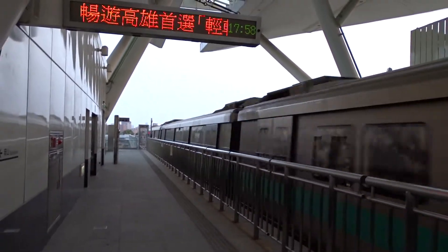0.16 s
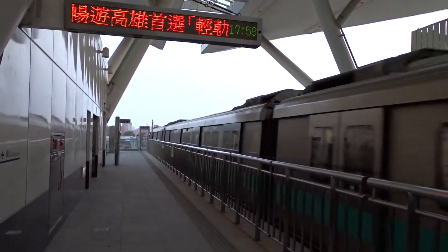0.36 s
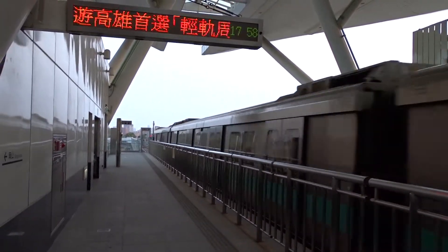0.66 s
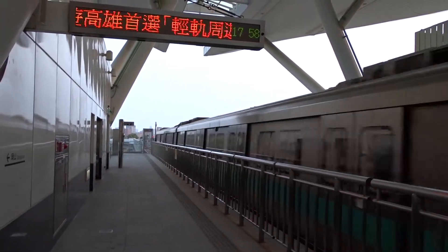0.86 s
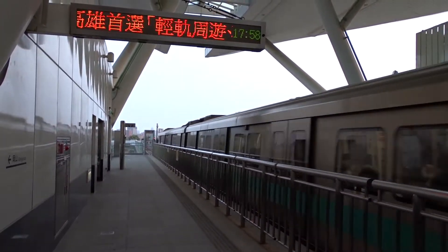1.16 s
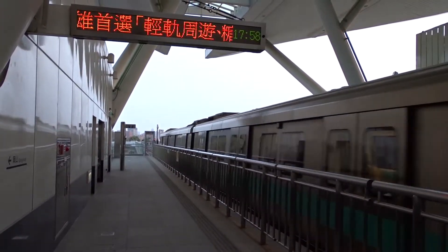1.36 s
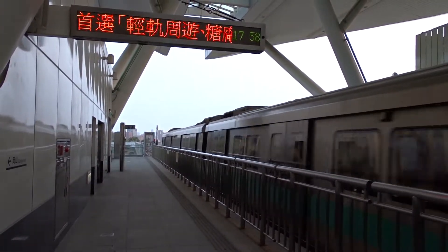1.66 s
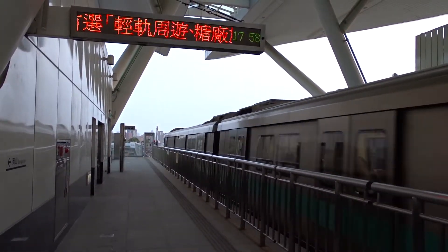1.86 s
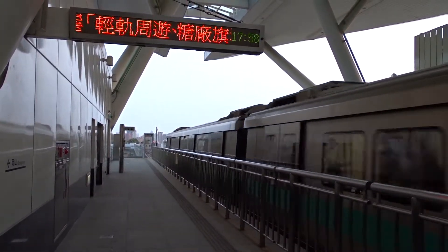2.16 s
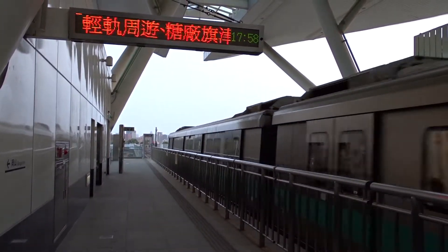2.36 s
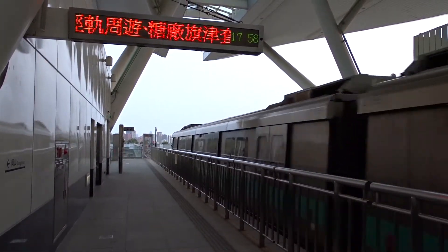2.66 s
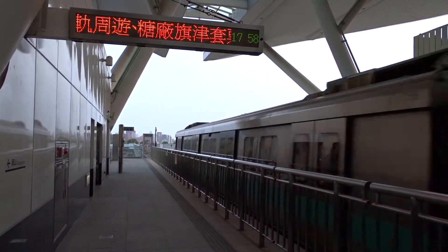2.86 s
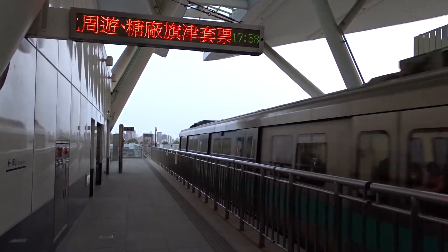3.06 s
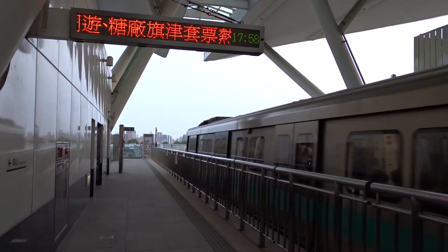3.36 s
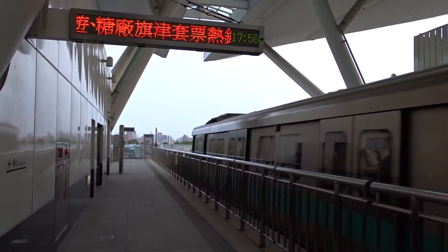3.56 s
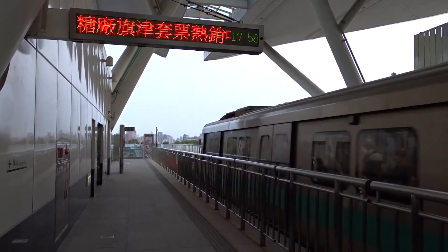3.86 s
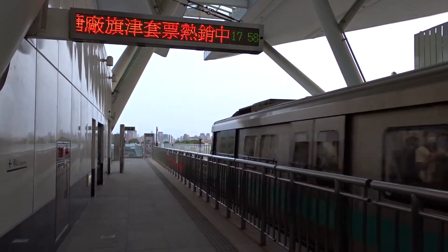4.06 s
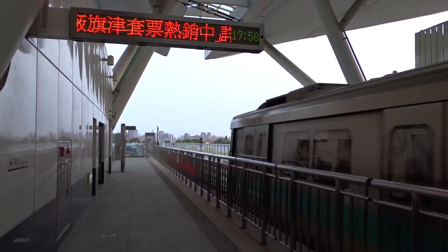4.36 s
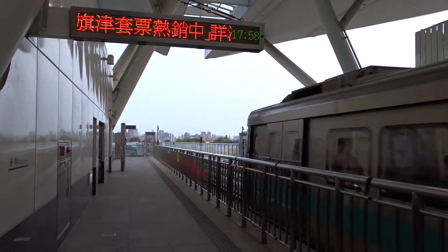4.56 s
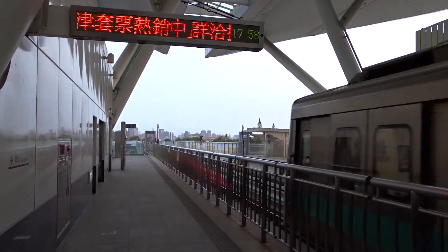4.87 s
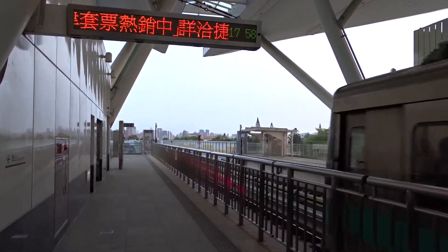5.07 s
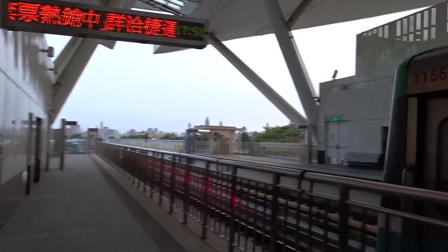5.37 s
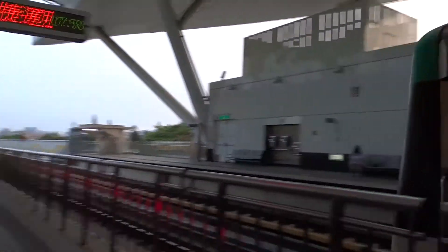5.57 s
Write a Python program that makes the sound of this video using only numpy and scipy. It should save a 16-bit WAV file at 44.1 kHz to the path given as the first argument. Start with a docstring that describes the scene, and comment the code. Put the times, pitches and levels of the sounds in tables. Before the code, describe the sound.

An electric train slows alongside an open, canopied elevated platform, cars passing close to a stereo microphone. A shrill, nearly constant electronic squeal sits over rumble and wheel roar. Gear whine slides downward while fixed hums and an underframe ring swell with passing cars. Rail ring and brake hiss grow early, then fade; the train is still moving at the end.

```python
"""Elevated platform: an electric train brakes alongside, its cars passing close to the microphone.
Inverters sing around multiples of a switching carrier, in sidebands that close up as the train slows.
Gear whine and motor growl fall with speed; a fixed underframe tone swells with each motor car.
Filtered noise makes the rumble, roar, rail ring and brake hiss; blurred fixed tones make the equipment hum."""
import sys
import numpy as np
from scipy import signal
from scipy.fft import rfft, irfft, next_fast_len
from scipy.io import wavfile
from scipy.ndimage import uniform_filter1d, map_coordinates

SR = 44100
rng = np.random.default_rng(int(sys.argv[2]) if len(sys.argv) > 2 else 0)


def output_pcm(signal):
    """Save a mono or channel-first signal as 16-bit PCM at the path in sys.argv[1].

    Samples are clipped to [-1, 1] before scaling.
    """
    pcm = np.clip(np.atleast_2d(signal).T, -1, 1) * 32767
    wavfile.write(sys.argv[1], SR, np.round(pcm).astype(np.int16))


N = 252252

# Reaches (_REACH_M): track distance from the microphone at which the gain is 3 dB down.
START_SPEED_M_PER_S, BRAKING_M_PER_S2, MESH_HZ_PER_M_PER_S = 11, 0.81, 80

# Inverter sidebands: carrier_multiple, distance_stator_cycles, level_db
INVERTER_SIDEBANDS = [(2, 1, -9.3), (2, 3.5, -13), (3, 1.1, -14.5), (3, 3, -15), (3, 6, -14), (4, 1, -17),
                      (4, 3.3, -22), (5, 2.5, -25), (6, 0.76, -21), (7, 2, -28), (8, 2, -23), (9, 3, -30),
                      (10, 2.4, -28), (11, 2.6, -37)]
# Gain of the inverter song: time_s, gain_db
SONG_GAIN = [(0, -28), (.85, -23), (2, -24), (3, -21), (3.55, -22.8), (4.1, -22), (5.72, -19.5)]
NOMINAL_CARRIER_HZ = 1000
TILT_START_DB_PER_OCTAVE, TILT_RISE_DB_PER_OCTAVE_S = -1.63, 0.37  # high tones open up
NEAR_INVERTER_S, NEAR_INVERTER_REACH_M, NEAR_SHARPENING_SHARE = 2.9, 3.5, 0.008
SAG_SHARE_PER_S, SAG_ZERO_S = 0.001, 4.2  # slow pitch fall, zero shift at SAG_ZERO_S

# Gearboxes passing: time_s, whine_db
GEARBOX_PASSES = [(.1, -29.5), (.92, -29), (2.35, -30.5), (3.95, -27.5), (4.9, -29)]
# Motors passing: time_s, growl_db
MOTOR_PASSES = [(.1, -30), (1.27, -26.5), (2.65, -36)]
GEARBOX_REACH_M, MOTOR_REACH_M = 2.4, 1.2
# Motor cars alongside, underframes ringing: start_s, end_s, ring_db
MOTOR_CARS = [(1.2, 2.48, -27), (3.0, 4.45, -27.5)]
CAR_ATTACK_S, CAR_RELEASE_S = 0.12, 0.18

# Rolling noise: time_s, body_rumble_db, wheel_roar_db
ROLLING_LEVELS = [(0, -22.5, -25.5), (.7, -24.5, -25.5), (1.3, -23, -23.5), (2.5, -22.5, -24),
                  (3.15, -25, -25), (3.8, -22.5, -23), (4.5, -26.5, -25), (5.72, -26, -26.5)]
# Bogies shaking the platform: time_s, boom_db
BOGIE_PASSES = [(3.05, -33.5), (4.9, -36.5)]
BOGIE_REACH_M = 0.67
# Car body rumble spectrum: frequency_hz, relative_db_per_hz
RUMBLE_SPECTRUM = [(15, -26), (30, -24), (55, -36), (85, -15), (130, -9), (220, -6.5), (300, -4),
                   (400, -4.5), (500, -9.5), (750, -21), (950, -37), (2000, -99)]
# Platform boom spectrum: frequency_hz, relative_db_per_hz
BOOM_SPECTRUM = [(15, -20), (45, -2), (85, 7), (140, -13), (400, -60)]
# Wheel roar spectrum: frequency_hz, relative_db_per_hz
ROAR_SPECTRUM = [(200, -82), (500, 3), (850, 5), (1000, 0.5), (1300, 0), (1700, -3), (2400, -5.5),
                 (3000, -12), (4000, -10.5), (8000, -49)]
# Rail ring spectrum: frequency_hz, relative_db_per_hz
RAIL_SPECTRUM = [(1500, -10), (2600, -20), (3200, 7), (3600, 0), (4100, 2), (4600, -10), (7000, -46)]
# Brake hiss spectrum: frequency_hz, relative_db_per_hz
HISS_SPECTRUM = [(2500, -8), (4500, 1), (5500, 4.5), (6500, 4.5), (7700, 6), (8600, 3.5), (9500, 0),
                 (10500, -2), (11200, -9.5)]
# Friction: levels at time 0 before approach and flutter, then a steady fall
RAIL_START_DB, RAIL_FALL_DB_PER_S = -30, 2.5
HISS_START_DB, HISS_FALL_DB_PER_S = -34.5, 0.77
APPROACH_MID_S, APPROACH_RISE_S, DISTANT_DB = 0.73, 0.14, -3.5

# Swells of the deep drone: start_s, end_s, level_db
DEEP_DRONE_SWELLS = [(.18, .26, -29.5), (.7, .8, -33), (1.15, 1.38, -27), (1.56, 1.72, -27),
                     (1.93, 1.98, -28), (2.76, 3.02, -30), (3.35, 3.56, -24.5), (3.8, 3.92, -29.5),
                     (5.12, 5.2, -31.5), (5.4, 5.55, -33.5)]
DRONE_MEAN_DB, DRONE_SWELL_S = -36, 0.047
# Fans and compressors: pitch_hz, width_hz, level_db
EQUIPMENT_HUMS = [(55.1, 11, -39.5), (120.6, 3.3, -41), (268.6, 10.4, -39), (341.7, 7.4, -41),
                  (525.4, 9.9, -44.5), (566, 6.4, -43), (1164, 36, -40)]
FAN_S, FAN_REACH_M, FAN_HZ, FAN_DB = 2.66, 3.2, 267, -31

# Left-right likeness of the two ports: frequency_hz, correlation_0_to_1
PORT_LIKENESS = [(60, 1), (150, 1), (500, 0.85), (1100, 1), (2000, 0.97), (5000, 0.78), (10400, 0.81)]
# Phase by which the left port leads: frequency_hz, lead_rad
LEFT_LEAD = [(40, -0.54), (170, -0.51), (300, -0.7), (550, -1.02), (1000, -1.13), (2000, -0.97),
             (4000, -0.53), (8000, 0.052), (10500, -1.04)]
TOP_HZ = 11050


def inverters(mesh_hz, mesh_per_cycle=23, spread_hz=11, spread_growth=1.43, squeal_db=-1.6):
    """Motor iron squeals at twice the switching rate; sideband pairs flank multiples of that rate."""
    t = seconds()
    stator_hz = mesh_hz / mesh_per_cycle
    sharpening = NEAR_SHARPENING_SHARE * nearness(NEAR_INVERTER_S, NEAR_INVERTER_REACH_M) ** 2
    sag = SAG_SHARE_PER_S * (SAG_ZERO_S - t)
    carrier_hz = NOMINAL_CARRIER_HZ * (1 + sharpening + sag)

    # Railing and wheels cut off short waves first: high tones flutter together
    flutter_db = 0.85 * wobble(28) + 0.55 * wobble(75)
    tilt_db_per_octave = TILT_START_DB_PER_OCTAVE + TILT_RISE_DB_PER_OCTAVE_S * t + flutter_db

    song = amp(squeal_db) * blurred(2 * carrier_hz, width_hz=33, steady=8, pace=mesh_hz)
    for multiple, distance, level_db in INVERTER_SIDEBANDS:
        gain = amp(level_db + tilt_db_per_octave * np.log2(multiple / 2))
        width_hz = spread_hz * multiple ** spread_growth
        for side in (-1, 1):
            hz = multiple * carrier_hz + side * distance * stator_hz
            song += gain * blurred(hz, width_hz, steady=0.15, pace=mesh_hz)
    return song * amp(curves(SONG_GAIN)[0] + 0.2 * flutter_db)


def gears(mesh_hz):
    """Tooth mesh whines, motors growl an octave below, and the underframe rings at a fixed pitch."""
    whine = passes(GEARBOX_PASSES, GEARBOX_REACH_M) * singing(mesh_hz, halo_db=2)
    growl = passes(MOTOR_PASSES, MOTOR_REACH_M) * singing(mesh_hz / 2, halo_db=5)
    frame = swells(MOTOR_CARS, CAR_ATTACK_S, CAR_RELEASE_S) * singing(674, halo_db=1.5)
    return whine + growl + frame


def wheels():
    """Car bodies rumble, bogies boom, wheels roar, rails ring and brake pads hiss unevenly."""
    t = seconds()
    rumble_db, roar_db = curves(ROLLING_LEVELS)
    chafe_db = approach_db() + 0.9 * wobble(26) + 0.55 * wobble(69)
    rail_db = RAIL_START_DB - RAIL_FALL_DB_PER_S * t + chafe_db
    hiss_db = HISS_START_DB - HISS_FALL_DB_PER_S * t + chafe_db

    rumble = amp(rumble_db) * rush(RUMBLE_SPECTRUM, patchy_db=1.0)
    boom = passes(BOGIE_PASSES, BOGIE_REACH_M) * rush(BOOM_SPECTRUM, patchy_db=-2.0)
    roar = amp(roar_db) * rush(ROAR_SPECTRUM, patchy_db=1.0)
    rail = amp(rail_db) * rush(RAIL_SPECTRUM, patchy_db=2.0)
    hiss = amp(hiss_db) * rush(HISS_SPECTRUM, patchy_db=1.0)
    return rumble + boom + roar + rail + hiss


def equipment(surge_db=2.5):
    """Underfloor machines hum at fixed pitches; the drone surges and swells, one fan passes close."""
    surging = amp(DRONE_MEAN_DB + surge_db * wobble(7))
    swelling = swells(DEEP_DRONE_SWELLS, DRONE_SWELL_S, DRONE_SWELL_S)
    drone = np.hypot(surging, swelling) * blurred(175, width_hz=5, steady=4.6)
    fan = amp(FAN_DB) * nearness(FAN_S, FAN_REACH_M) * blurred(FAN_HZ, width_hz=5, steady=1.5)
    hums = sum(amp(db) * blurred(hz, width_hz, steady=0.033) for hz, width_hz, db in EQUIPMENT_HUMS)
    return drone + fan + hums


def microphone(pair):
    """Two close ports share most of the sound, the right mostly ahead; canopy echoes set them apart."""
    def split(hz):
        angle = np.arccos(np.clip(along(PORT_LIKENESS, hz), -1, 1)) / 2
        return np.array([np.cos(angle), np.sin(angle)])

    common, diffuse = filtered(pair, split)
    ports = np.array([common + diffuse, common - diffuse])
    return filtered(ports, lambda hz: np.exp(0.5j * np.outer([1, -1], along(LEFT_LEAD, hz))))


def singing(hz, halo_db):
    """A clear direct tone inside the wider halo of its echoes, rms 1."""
    core = blurred(hz, width_hz=11, steady=2)
    halo = blurred(hz, width_hz=41.5, steady=0.93)
    return unit(core + amp(halo_db) * halo)


def blurred(hz, width_hz, steady, pace=1, size=8192):
    """Two versions of a tone over many changing paths: level and phase wander, faster at higher pace."""
    offset_hz = np.fft.rfftfreq(size, N / SR / size)
    lowpass = 1 / (1 + (offset_hz / width_hz) ** 4) ** 0.5
    parts = irfft(rfft(rng.standard_normal((2, 2, size))) * lowpass)
    paths = unit(parts[0] + 1j * parts[1])
    paths = unit(paths / (1 + abs(steady) * np.abs(paths) ** 2) ** 0.5)  # evens out the level

    travel = np.cumsum(pace * np.ones(N))
    knots = np.linspace(0, travel[-1], size)
    turn = np.exp(2j * np.pi * np.cumsum(hz * np.ones(N)) / SR)
    return unit(np.array([(np.interp(travel, knots, path) * turn).real for path in paths]))


def rush(spectrum, patchy_db):
    """Two unrelated noises, jointly rms 1, sharing time-frequency patches of random gain."""
    noise = signal.stft(rng.standard_normal((2, N)), nperseg=512)[2]
    field = rng.standard_normal(noise.shape[1:])
    field = uniform_filter1d(field, size=9, axis=0)
    field = uniform_filter1d(field, size=12, axis=1)
    pair = signal.istft(noise * amp(patchy_db * unit(field)), nperseg=512)[1][:, :N]
    return unit(filtered(pair, lambda hz: amp(along(spectrum, hz))))


def speed():
    """Train speed in m/s under even braking."""
    return START_SPEED_M_PER_S - BRAKING_M_PER_S2 * seconds()


def nearness(pass_s, reach_m):
    """Gain 0-1 of a part that passes at pass_s: one over its distance."""
    track_m = np.cumsum(speed()) / SR
    offset_m = track_m - np.interp(pass_s, seconds(), track_m)
    return 1 / np.hypot(1, offset_m / reach_m)


def passes(rows, reach_m):
    """Joint gain of like parts passing in turn, their powers added."""
    return np.sqrt(sum((amp(db) * nearness(pass_s, reach_m)) ** 2 for pass_s, db in rows))


def swells(rows, attack_s, release_s):
    """Summed gains that rise, hold from start to end and die away."""
    t = seconds()
    total = 0
    for start_s, end_s, level_db in rows:
        before = np.minimum(t - start_s, 0) / attack_s
        after = np.maximum(t - end_s, 0) / release_s
        total = total + amp(level_db) * np.exp(-before ** 2 - after ** 2)
    return total


def approach_db():
    """Friction builds up to 0 dB as the first braked wheels draw near."""
    return DISTANT_DB * (1 - np.tanh((seconds() - APPROACH_MID_S) / APPROACH_RISE_S)) / 2


def seconds():
    """Time of each sample."""
    return np.arange(N) / SR


def curves(rows):
    """One value per sample for each column after the time."""
    time_s, *columns = np.transpose(rows)
    return [np.interp(seconds(), time_s, column) for column in columns]


def wobble(rate_hz):
    """Smooth random curve with rate_hz knots a second."""
    knots = rng.standard_normal(int(N * rate_hz / SR) + 4)
    return map_coordinates(knots, [np.arange(N) * rate_hz / SR])


def filtered(x, response):
    """x through a complex response of frequency, zero-padded."""
    size = next_fast_len(N + SR // 4)
    return irfft(rfft(x, size) * response(np.fft.rfftfreq(size, 1 / SR)), size)[..., :N]


def along(points, hz):
    """Interpolate (frequency_hz, value) points on a log axis."""
    point_hz, values = np.transpose(points)
    return np.interp(np.log(hz + 1), np.log(point_hz + 1), values)


def amp(db):
    """Decibels to gain."""
    return 10 ** (np.asarray(db) / 20)


def unit(x):
    """Scale to rms 1."""
    return x / np.sqrt(np.mean(np.abs(x) ** 2) + 1e-20)


def scene():
    """Train speed sets the gear mesh rate and the inverters' stator rate together."""
    mesh_hz = MESH_HZ_PER_M_PER_S * speed()
    return microphone(inverters(mesh_hz) + gears(mesh_hz) + wheels() + equipment())


def record(dry):
    """Nothing is kept above the band limit."""
    return filtered(dry, lambda hz: hz < TOP_HZ)


dry = scene()
out = record(dry)
output_pcm(out)
```